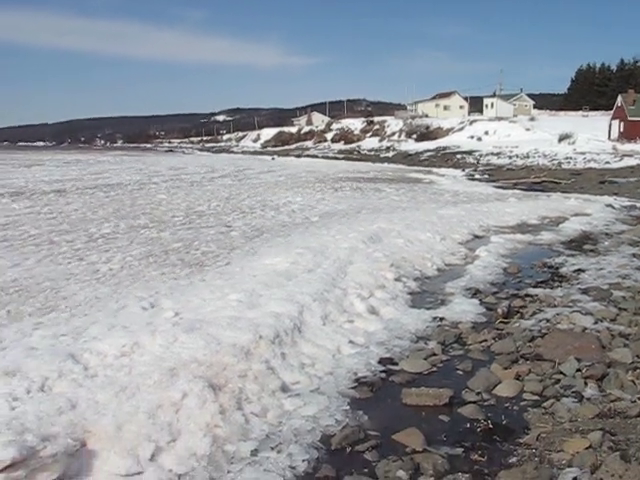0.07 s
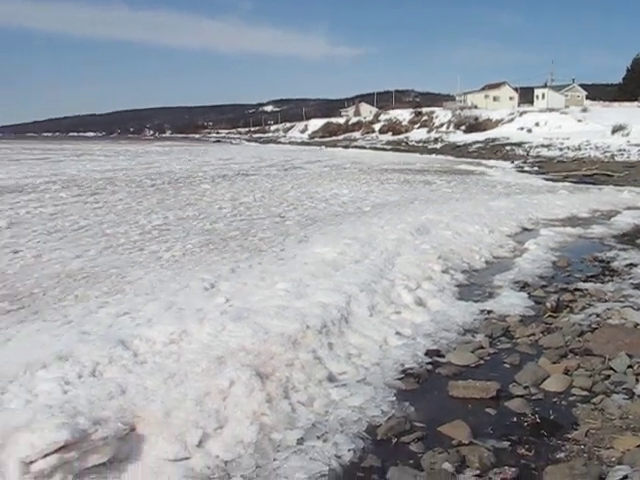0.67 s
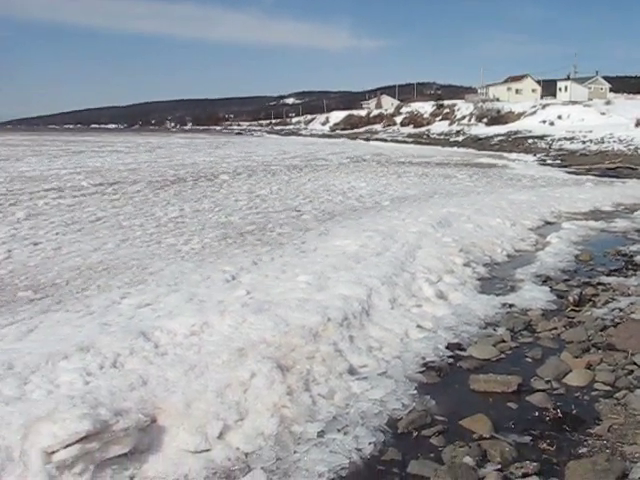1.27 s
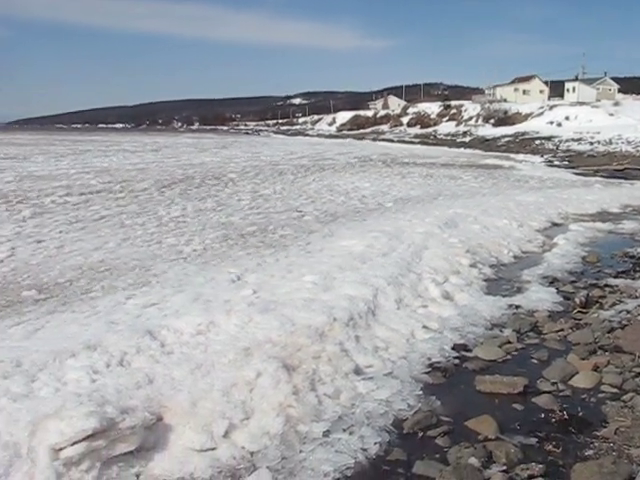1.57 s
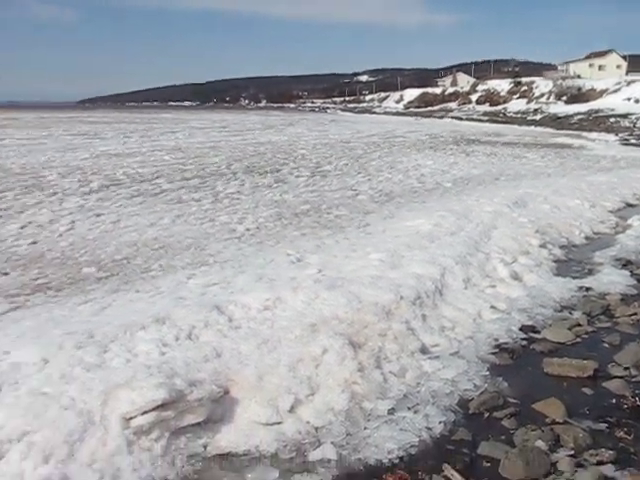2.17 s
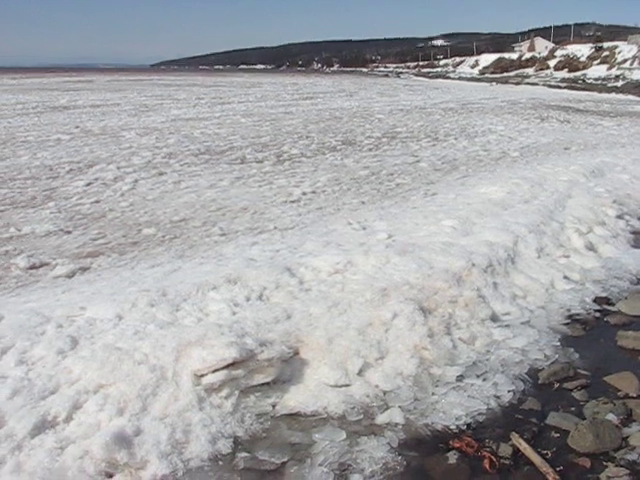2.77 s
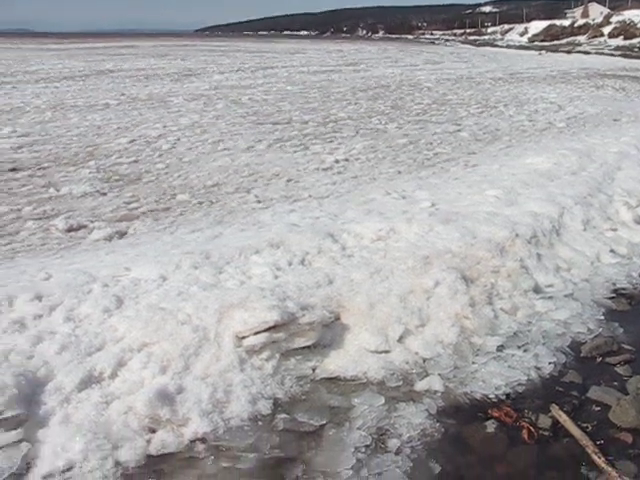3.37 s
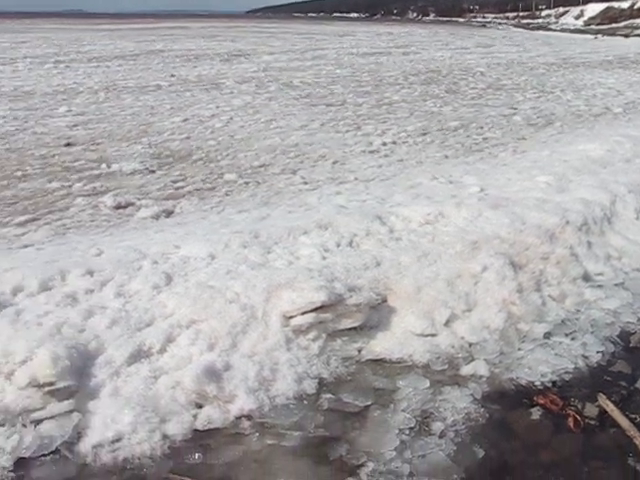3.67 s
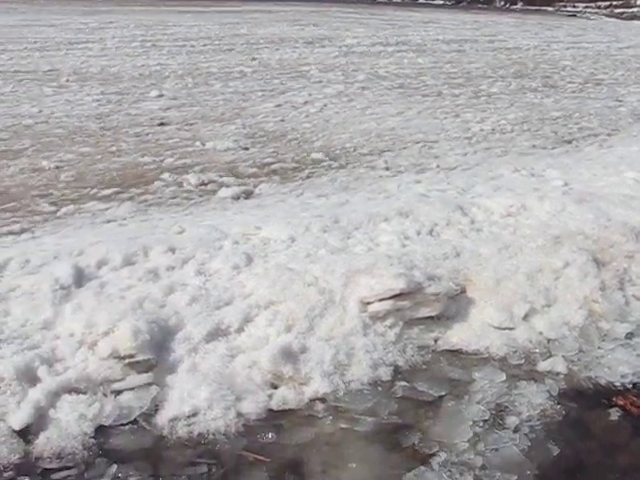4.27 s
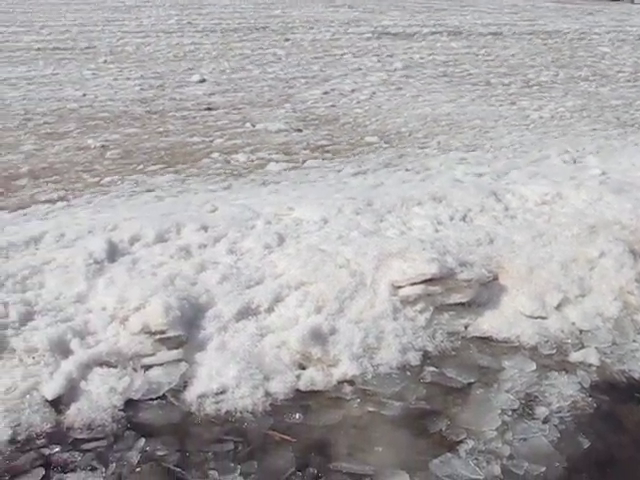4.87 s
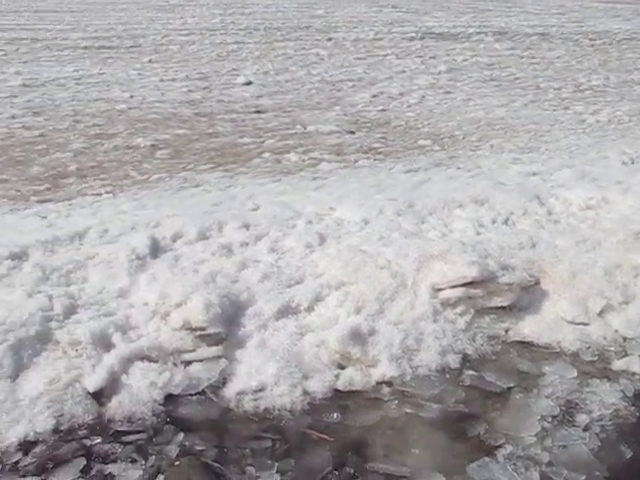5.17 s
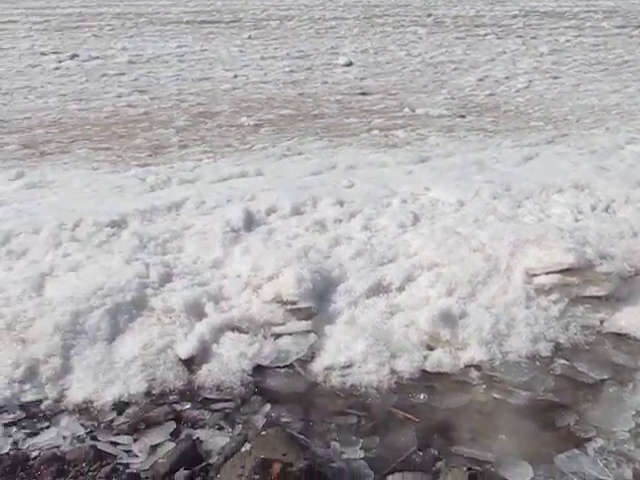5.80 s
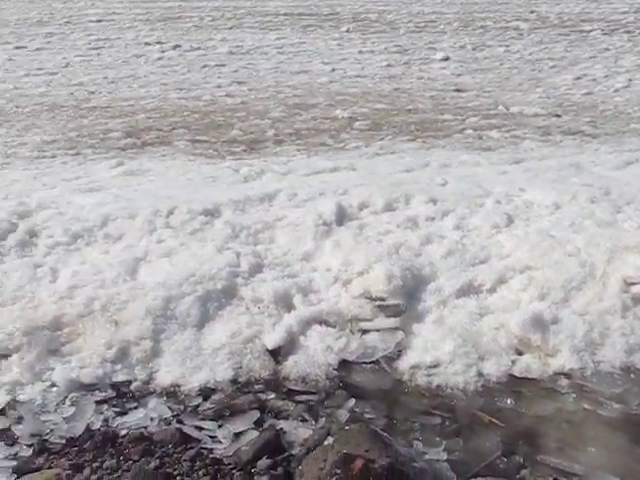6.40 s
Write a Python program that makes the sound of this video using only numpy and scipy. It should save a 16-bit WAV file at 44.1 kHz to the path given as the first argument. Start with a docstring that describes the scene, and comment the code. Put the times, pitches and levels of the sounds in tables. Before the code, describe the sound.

Gusts rumble and thud on the microphone, growing over the soft fizz of icy water and tiny crackles of ice.

```python
"""Slush hisses as a low swell works it against an icy shore: crystals rub and small bubbles burst. Close by,
wet pebbles knock and ring, and footsteps crunch over the stones in showers of tiny fractures. A rising wind
tumbles over the left microphone port, its eddies heard as rumbling gusts and thuds, while the right port lies
in the lee. Near the end the wind blows steadily and the hiss dims abruptly."""
import sys
import numpy as np
from scipy import signal
from scipy.fft import rfft, irfft, next_fast_len
from scipy.io import wavfile
from scipy.ndimage import uniform_filter1d

SR = 44100
rng = np.random.default_rng(int(sys.argv[2]) if len(sys.argv) > 2 else 0)


def unload_audio(sound):
    """Save the sound as a 16-bit wav file, at the path given as the first command line argument."""
    columns = np.transpose(np.atleast_2d(sound))
    # keep every value between -1 and 1, then stretch to whole-number steps
    steps = np.round(np.clip(columns, -1, 1) * 32767)
    wavfile.write(sys.argv[1], SR, steps.astype(np.int16))


N = 284004
T = np.arange(N) / SR

# Levels are relative within each table. # The slush hiss rises and falls, then dims abruptly near the end:
# time_s, level_db
HISS_LEVEL = [(0, 4.5), (.76, 5.5), (.95, -2.5), (1.15, -4), (1.75, -2), (2.05, -1), (2.4, 1.2),
              (2.85, 3.5), (3.2, 3), (3.55, 0.5), (4.3, 2), (4.8, 8), (5.35, 3), (5.68, 1.4), (5.95, -7.5),
              (6.44, -9)]
# Low wash of water further along the shore: time_s, level_db
WASH_LEVEL = [(0, 1.5), (1.75, -2.2), (3.1, 2), (5.05, -1), (5.8, -6), (6.44, -1.5)]
# Spectrum of the slush: frequency_hz, left_db, right_db
SLUSH_SPECTRUM = [(98.4, -55, -70.5), (296, -77, -73), (550, -75.5, -76), (1060, -80.5, -80),
                  (1400, -82.5, -83.5), (2560, -86, -84.5), (4040, -84.5, -90), (5200, -82.5, -86),
                  (6880, -79.5, -80.5), (7770, -82.5, -84.5), (9200, -93.5, -93), (10500, -99, -98),
                  (12600, -93, -105), (14700, -102, -107)]
# Wind between gusts and the top edge of its turbulence: time_s, level_db, edge_hz
BREEZE_COURSE = [(0, -27.5, 490), (1.15, -35.5, 468), (1.5, -30, 460), (2.05, -25.5, 535),
                 (2.6, -23.5, 620), (3.2, -20, 656), (3.44, -35, 580), (3.66, -25.5, 710),
                 (3.98, -25.5, 770), (4.42, -18.5, 690), (4.68, -26, 690), (4.85, -22, 820),
                 (5.0, -17.5, 1300), (5.35, -13, 1970), (5.56, -14, 1860), (5.75, -13, 2050),
                 (6.2, -14, 2570), (6.44, -14.5, 2680)]
# Gusts buffeting the exposed port: centre_s, level_db, half_length_s
WIND_GUSTS = [(0.056, -20.5, 0.018), (1.29, -25, 0.026), (1.594, -23.5, 0.025), (1.717, -26, 0.04),
              (2.093, -21.5, 0.027), (2.228, -19, 0.037), (2.38, -25, 0.016), (2.751, -17.5, 0.027),
              (2.853, -17.5, 0.058), (3.04, -25, 0.036), (3.365, -19, 0.027), (3.729, -22, 0.075),
              (3.847, -14.5, 0.014), (4.188, -12.5, 0.085), (4.369, -11, 0.067), (4.57, -14.5, 0.048),
              (4.768, -18.5, 0.042), (4.909, -17, 0.032), (4.994, -15, 0.048), (5.145, -15, 0.0077),
              (5.212, -11, 0.0089), (5.287, -10.5, 0.021)]
# Spectrum of the turbulence at each port: frequency_hz, exposed_db, sheltered_db
TURBULENCE_SPECTRUM = [(18, 16, -26), (35, 0.5, 0), (83, 2.5, 9.5), (156, 0.5, -2.5), (241, -4, 0),
                       (356, -9.5, -14.5), (657, -18.5, -30), (1080, -23.5, -27), (2200, -31.5, -47),
                       (5700, -51.5, -68)]
# Loose pebbles knocking together: start_s, level_db, pitch_hz
PEBBLE_KNOCKS = [(0.079, -36, 2470), (.124, -28, 2150), (.189, -30.5, 2320), (.223, -32, 2200),
                 (0.246, -31, 2600), (0.357, -31, 1570), (.6, -27, 6340), (1.018, -34, 3320),
                 (1.382, -16.5, 5880), (2.509, -26, 1200), (3.405, -37, 1120)]
# Footsteps crunching on stones: peak_s, level_db, rise_s, decay_s, pitch_hz, width_octaves
CRUNCHES = [(.121, -24.5, 0.00048, 0.0073, 4860, 1.2), (.15, -27, 0.00089, 0.0026, 4580, 1.5),
            (.244, -33.5, 0.0094, 0.015, 2600, 1.2), (.315, -37, .002, 0.045, 3200, 2.6),
            (.436, -31, 0.012, 0.0049, 4800, 1.7), (.6, -29, 0.00091, 0.0036, 5470, 1.14),
            (.814, -29.5, 0.016, 0.01, 3340, 2.2), (.943, -32.5, .001, .002, 5470, 1.7),
            (1.019, -41, 0.00073, 0.0029, 3800, 2), (1.05, -38.5, 0.014, 0.0085, 3780, 3.3),
            (1.22, -38, 0.0025, 0.0089, 5600, 3.8), (1.245, -29.5, 0.00049, 0.0016, 4230, 2.7),
            (1.3812, -19.5, 0.0016, 0.0089, 4390, 0.97), (1.3835, -35, 0.0011, 0.011, 730, .9),
            (1.526, -36.5, 0.00073, 0.0063, 3600, 1.4), (1.596, -32, 0.00048, 0.0018, 4800, 1.7),
            (1.625, -40.5, 0.015, .008, 3260, 2.9), (1.713, -37, 0.00081, 0.0023, 5940, 1.6),
            (1.905, -39.5, 0.037, 0.026, 7050, 0.77), (1.92, -40, .014, 0.021, 1930, 1.1),
            (2.179, -42, 0.0029, 0.015, 3000, 2), (2.509, -32.5, .001, 0.0056, 1000, 2.4),
            (3.096, -37.5, .001, .004, 2600, 2.1), (3.229, -38, .001, 0.0059, 2100, 1.4)]
# Spectrum shared by all crunches: frequency_hz, left_db, right_db
CRUNCH_SPECTRUM = [(247, -18, 0), (900, 1, -4), (1390, 6, -6), (1920, 7.5, 2.5), (2720, 1, -1.5),
                   (4400, -2.5, -3), (7500, -9, -1), (8200, -4.5, -13), (10200, -16, -13), (12500, -4, -24),
                   (15500, -27, -37)]
# Single large eddies striking the exposed port: centre_s, level_db, half_length_s
LARGE_EDDIES = [(1.597, -7, 0.002), (2.004, -10.5, 0.00064), (2.298, -11.5, 0.00069), (2.726, -8, 0.00069),
                (2.838, -2, 0.0011), (3.036, -5, 0.001), (3.352, -5.5, 0.0021), (3.73, -5, 0.0024),
                (3.772, -5.5, .0012), (3.852, -5.5, 0.0024), (4.154, -22, 0.0011), (4.237, -11, 0.0007),
                (4.336, -6, 0.0005), (4.396, 0, 0.00092), (4.536, -4, 0.00074), (4.736, -3, 0.0014),
                (4.896, 2, 0.0013), (4.976, -4, 0.0007), (5.025, 4, .0011), (5.222, 3, .0013),
                (5.3, 2.5, 0.00064), (5.339, -11, .0005), (5.789, -9, 0.00044)]


def undb(db):
    """Amplitude grows tenfold for every 20 dB."""
    return 10 ** (np.asarray(db) / 20)


def unit(x):
    """Normalisation to rms 1."""
    return x / np.sqrt(np.mean(x ** 2))


def even(x, size):
    """Normalisation to rms 1 over every stretch of about size samples."""
    return x / np.sqrt(uniform_filter1d(uniform_filter1d(x ** 2, size), size) + 1e-9)


def curves(table):
    """Linear interpolation turns each column into a control over time."""
    times, *columns = np.transpose(table)
    return [np.interp(T, times, column) for column in columns]


def bin_hz(size):
    """Frequencies of a Fourier transform, floored at 1 Hz."""
    return np.maximum(np.arange(size // 2 + 1) * SR / size, 1)


def colour(x, spectrum, side=0):
    """Spectral weighting by the left (0) or right (1) column of a table."""
    hz, *levels = np.transpose(spectrum)
    size = next_fast_len(len(x))
    db = np.interp(np.log(bin_hz(size)), np.log(hz), levels[side])
    return irfft(rfft(x, size) * undb(db), size)[:len(x)]


def split(x, centres_hz):
    """Complementary filters: overlapping bands that sum to the whole sound."""
    size = next_fast_len(N)
    log_hz, spectrum = np.log(bin_hz(size)), rfft(x, size)
    weights = [np.interp(log_hz, np.log(centres_hz), row) for row in np.eye(len(centres_hz))]
    return [irfft(spectrum * weight, size)[:N] for weight in weights]


def wander(per_s):
    """Random modulation: per_s new values a second, joined by ramps; rms 1."""
    hold = SR // per_s
    steps = np.repeat(rng.standard_normal(N // hold + 1), hold)
    return unit(uniform_filter1d(steps, hold)[:N])


def grains(per_s, spread_db):
    """Shot noise: random clicks, many weak and a few strong; rms 1."""
    strength = undb(spread_db * np.minimum(rng.exponential(size=N), 4))
    return unit((rng.random(N) < per_s / SR) * strength * rng.choice([-1, 1], N))


def blend(a, b, share):
    """Independent noises add in power; b supplies the given share."""
    return np.sqrt(1 - share) * a + np.sqrt(share) * b


def seethe():
    """Countless tiny impulses merge into Gaussian noise, while some stand out as grains."""
    return blend(rng.standard_normal(N), grains(per_s=5000, spread_db=3.5), share=0.38)


def slush(gain_db=44, flicker_db=0.5):
    """Rubbing crystals and bursting bubbles add incoherently; the ports share mainly the low wash."""
    (wash_db,), (hiss_db,) = curves(WASH_LEVEL), curves(HISS_LEVEL)
    centres_hz = [800, 2600, 7000, 12000]  # wash, rustle, fizz, finest fizz
    levels_db = [wash_db, 0.98 * hiss_db - 1.5, hiss_db, 1.14 * hiss_db]
    correlations = [0.77, 0.063, 0, 0]
    gains = [undb(db + gain_db + flicker_db * wander(per_s=14)) for db in levels_db]
    shared_bands, out = split(seethe(), centres_hz), []
    for side in range(2):
        bands = zip(gains, split(seethe(), centres_hz), shared_bands, correlations)
        hiss = sum(gain * blend(own, shared, share) for gain, own, shared, share in bands)
        out.append(colour(hiss, SLUSH_SPECTRUM, side))
    return np.array(out)


def gust_power(centre_s, level_db, half_length_s, abruptness=3.3):
    """A gust's power swells and dies as a flat-topped bell; abruptness 2 would be Gaussian."""
    return undb(level_db) ** 2 * np.exp(-2 * np.abs((T - centre_s) / half_length_s) ** abruptness)


def wind(octaves_per_db=0.06):
    """Breeze and gusts add in power; faster air sheds smaller eddies, raising the spectrum's top edge."""
    breeze_db, breeze_hz = curves(BREEZE_COURSE)
    wind_db = 10 * np.log10(undb(breeze_db) ** 2 + sum(gust_power(*gust) for gust in WIND_GUSTS))
    edge_hz = breeze_hz * 2 ** (octaves_per_db * (wind_db - breeze_db))
    return wind_db, edge_hz


def flurries(edge_hz, steady_hz=1750, drag_s=0.0098):
    """Intermittency: weak wind comes in ragged puffs, strong wind keeps mainly its fast flutter."""
    ragged = 1 / np.hypot(1, (edge_hz / steady_hz) ** 2)
    flurry = 2 * np.tanh((1.18 * ragged * wander(per_s=70) + 0.85 * wander(per_s=240)) / 2)
    # each large eddy drags a flurry along, the fiercer the faster it passes
    for centre_s, _, half_length_s in LARGE_EDDIES:
        near = np.abs(T - centre_s) < 0.03
        strength = 0.00138 / half_length_s
        flurry[near] += strength * ragged[near] * np.exp(-((T[near] - centre_s) / drag_s) ** 2)
    return flurry


def exposed_port(wind_db, edge_hz, gain_db=0.23, flutter_db=3, flurry_octaves=0.27, flicker_db=0.93):
    """Turbulent pressure rumbles in a band that rises with air speed; flurries are louder and brighter."""
    flurry = flurries(edge_hz)
    top_hz = edge_hz * 2 ** (flurry_octaves * flurry)
    bottom_hz = 0.075 * edge_hz
    centres_hz = 20 * 2 ** np.arange(0, 9, 0.5)
    turbulence = unit(colour(rng.standard_normal(N), TURBULENCE_SPECTRUM))
    rumble = 0
    for hz, band in zip(centres_hz, split(turbulence, centres_hz)):
        passed = 1 / np.sqrt((1 + (hz / top_hz) ** 6.8) * (1 + (bottom_hz / hz) ** 3.72))
        rumble = rumble + band * passed * undb(flicker_db * wander(per_s=40))
    # the flurries share out the energy that the gust brings
    return even(rumble * undb(flutter_db * flurry), size=3300) * undb(wind_db + gain_db)


def sheltered_port(wind_db, lee_db=-22, flutter_db=3.5):
    """Wind shadow: only a weak, dull rumble reaches the lee, with the gusts smoothed out."""
    power = uniform_filter1d(undb(wind_db + lee_db) ** 2, size=SR // 6)
    power += gust_power(centre_s=1.07, level_db=-37.5, half_length_s=0.12)  # one puff curls into the lee
    rumble = unit(colour(rng.standard_normal(N), TURBULENCE_SPECTRUM, side=1))
    return rumble * np.sqrt(power) * undb(flutter_db * wander(per_s=22))


def ticks(count=80, fade_db_per_s=2.8, spread_db=2.5, spread_octaves=0.33):
    """Directivity: faint random crunches fade as the microphone turns away; rows as in CRUNCHES."""
    rise_s, decay_s, width_octaves = 0.0012, 0.0023, 1.4
    rows = []
    for slot in range(count):
        peak_s = (slot + rng.random()) / count * T[-1]
        level_db = -36 - fade_db_per_s * peak_s + spread_db * rng.standard_normal()
        pitch_hz = 3400 * 2 ** (spread_octaves * rng.standard_normal())
        rows.append((peak_s, level_db, rise_s, decay_s, pitch_hz, width_octaves))
    return rows


def pebble_clinks(left_db=-3, right_db=0, decay_s=0.003, upper_ratio=1.113, upper_db=-5):
    """Free vibration: a knocked pebble rings in two quickly damped modes."""
    out = np.zeros(N)
    for start_s, level_db, pitch_hz in PEBBLE_KNOCKS:
        near = (T >= start_s) & (T < start_s + 0.06)
        t = T[near] - start_s
        phase = 2 * np.pi * pitch_hz * t
        modes = np.sin(phase) + undb(upper_db) * np.sin(upper_ratio * phase)
        out[near] += undb(level_db) * modes * np.exp(-t / decay_s)
    return np.outer(undb([left_db, right_db]), out)


def crackles(left_db=-1, right_db=1.5, correlation=0.37, per_s=2200):
    """Brittle fracture: each crunch is a shower of tiny cracks, and larger pieces sound lower."""
    shared = grains(per_s, spread_db=1.5)
    out, crunches = np.zeros((2, N)), list(CRUNCHES) + ticks()
    for side, side_db in enumerate([left_db, right_db]):
        fractures = blend(grains(per_s, spread_db=2), shared, correlation)
        shower = colour(fractures, CRUNCH_SPECTRUM, side)
        for peak_s, level_db, rise_s, decay_s, pitch_hz, width_octaves in crunches:
            near = np.abs(T - peak_s) < 0.07
            t = T[near] - peak_s
            envelope = np.exp(-np.where(t < 0, -t / rise_s, t / decay_s))
            octaves = np.log2(bin_hz(len(t)) / pitch_hz)
            passed = 1 / (1 + (octaves / width_octaves) ** 2) ** 2
            burst = irfft(rfft(shower[near] * envelope) * passed, len(t))
            out[side, near] += unit(burst) * np.sqrt(np.mean(envelope ** 2)) * undb(level_db + side_db)
    return out


def eddy_thuds(gain_db=-3):
    """A passing eddy makes a pressure pulse on the port, with suction before and after."""
    out = np.zeros(N)
    for centre_s, level_db, half_length_s in LARGE_EDDIES:
        near = np.abs(T - centre_s) < 10 * half_length_s
        u = (T[near] - centre_s) / half_length_s
        out[near] += undb(level_db + gain_db) * (1 - u ** 2) * np.exp(-u ** 2 / 2)
    return out


def scene():
    """Superposition: the shore sounds in both ports, and each port adds its own wind noise."""
    wind_db, edge_hz = wind()
    shore = slush() + crackles() + pebble_clinks()
    left = exposed_port(wind_db, edge_hz) + eddy_thuds()
    right = sheltered_port(wind_db)
    return shore + np.array([left, right])


def record(dry, bottom_hz=24, top_hz=15850):
    """Band limiting and saturation: the microphone loses deep bass, rounds hard thuds and cuts the top."""
    highpass = signal.butter(2, bottom_hz, "high", fs=SR, output="sos")
    lowpass = signal.ellip(8, 0.2, 70, top_hz, fs=SR, output="sos")
    pressure = signal.sosfilt(highpass, dry)
    rounded = pressure / (1 + pressure ** 6) ** (1 / 6)
    return signal.sosfilt(lowpass, rounded)


dry = scene()
out = record(dry)
unload_audio(out)
```